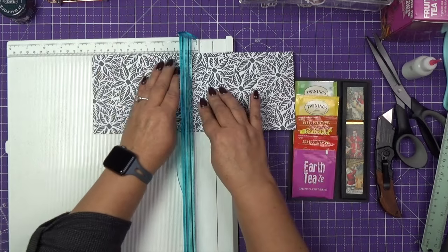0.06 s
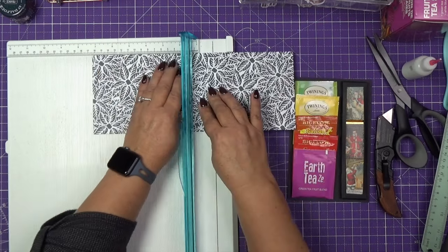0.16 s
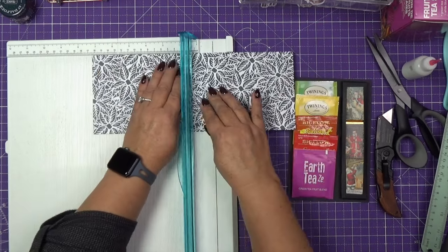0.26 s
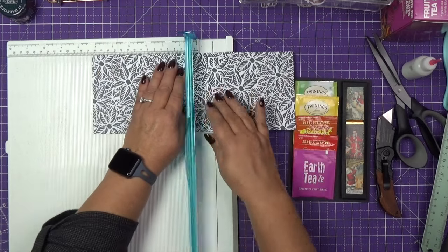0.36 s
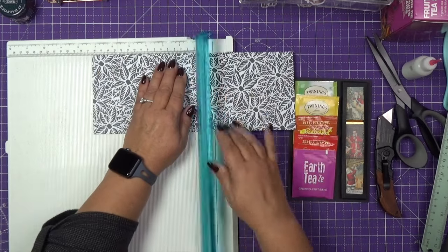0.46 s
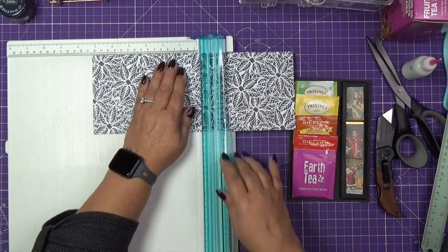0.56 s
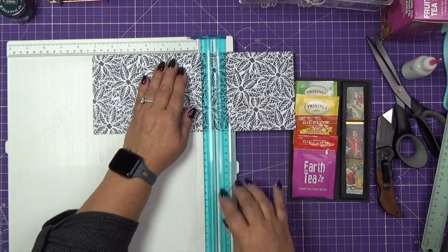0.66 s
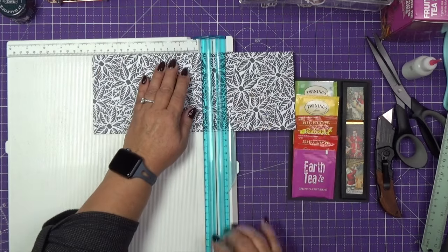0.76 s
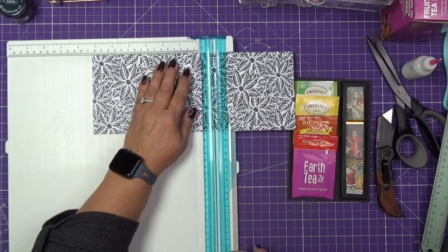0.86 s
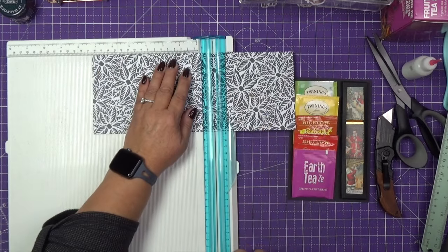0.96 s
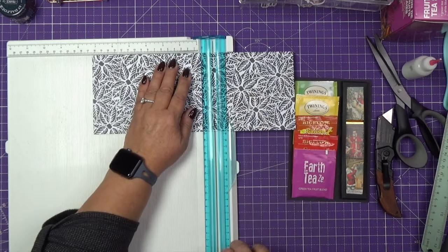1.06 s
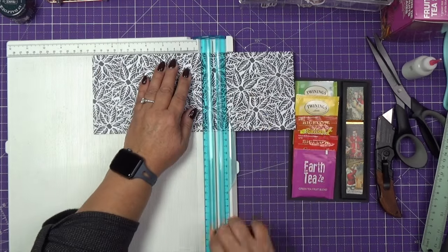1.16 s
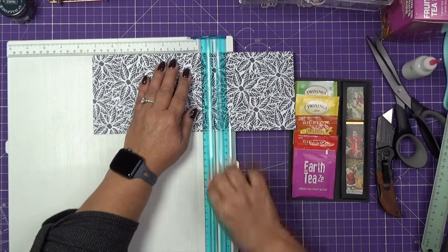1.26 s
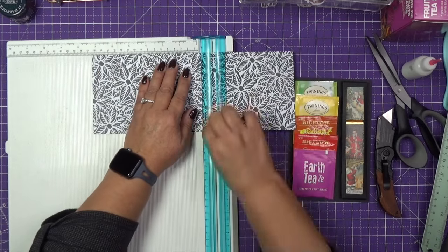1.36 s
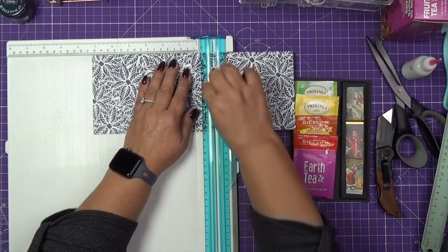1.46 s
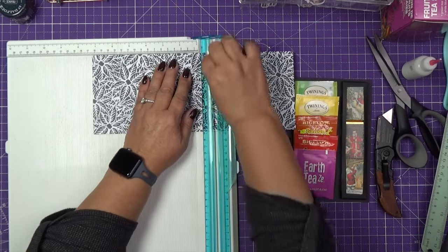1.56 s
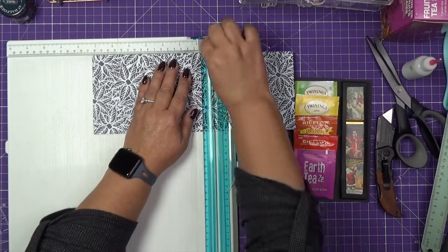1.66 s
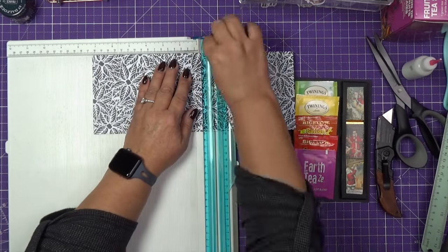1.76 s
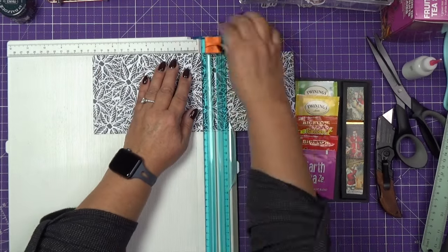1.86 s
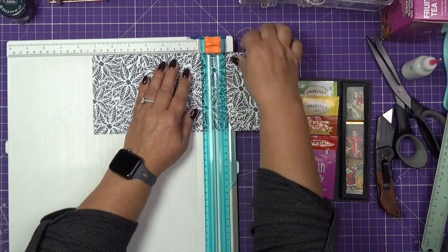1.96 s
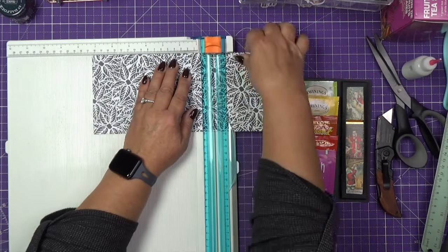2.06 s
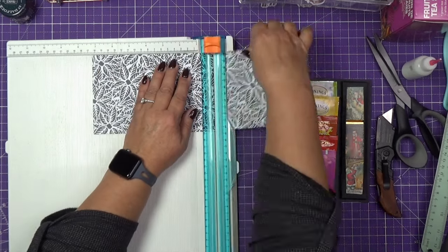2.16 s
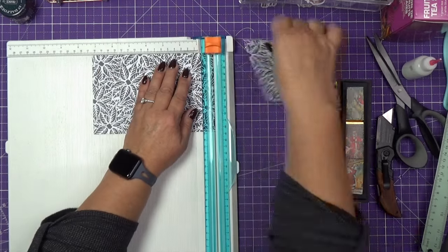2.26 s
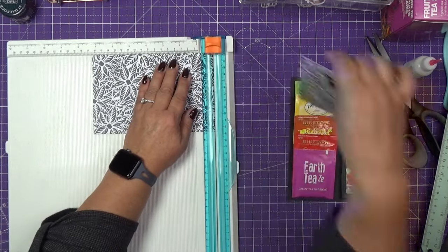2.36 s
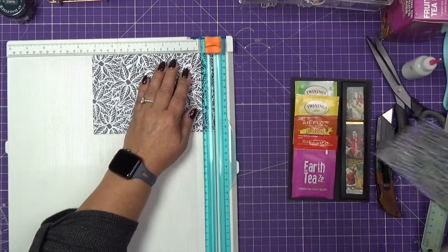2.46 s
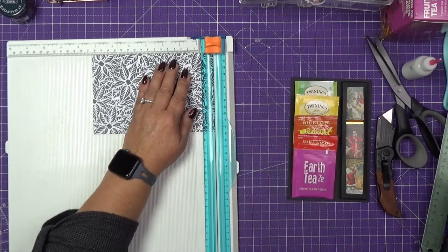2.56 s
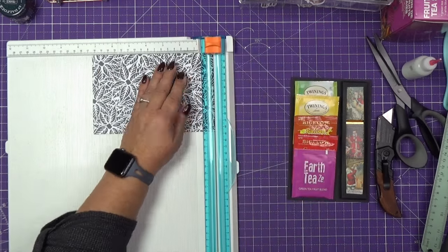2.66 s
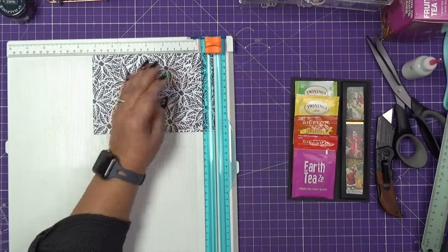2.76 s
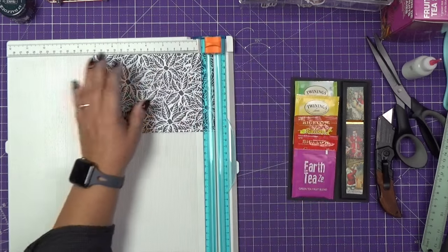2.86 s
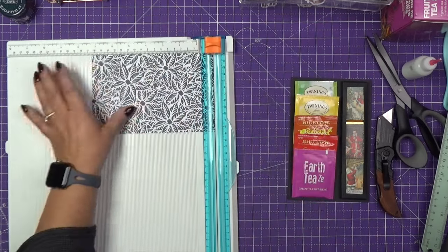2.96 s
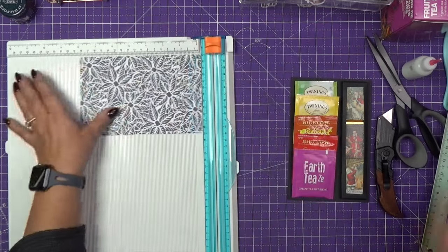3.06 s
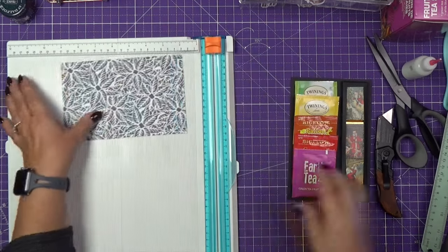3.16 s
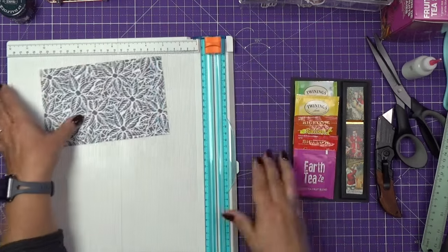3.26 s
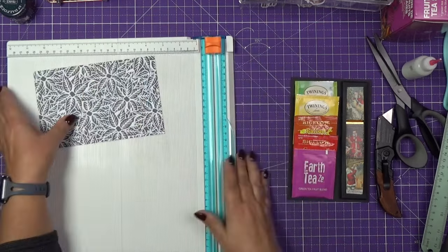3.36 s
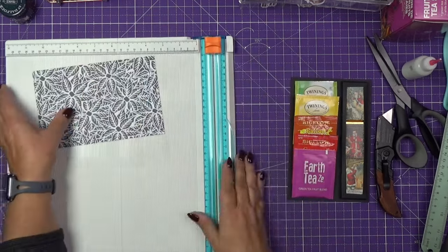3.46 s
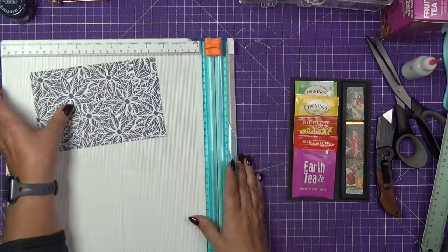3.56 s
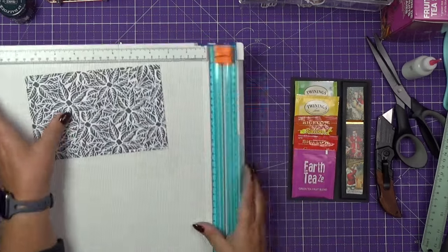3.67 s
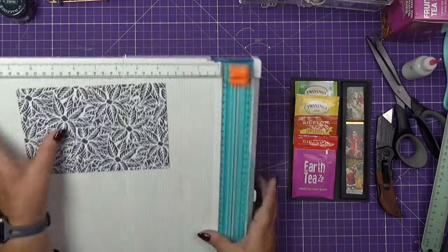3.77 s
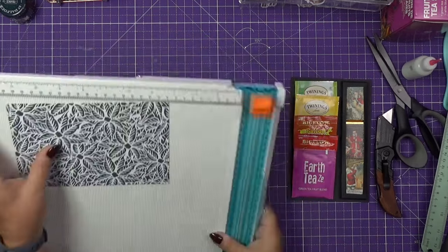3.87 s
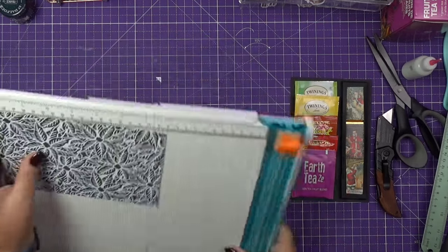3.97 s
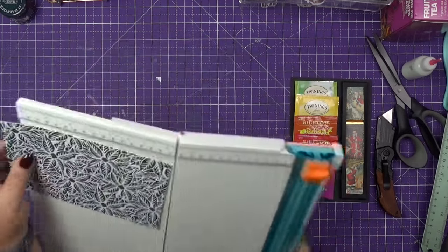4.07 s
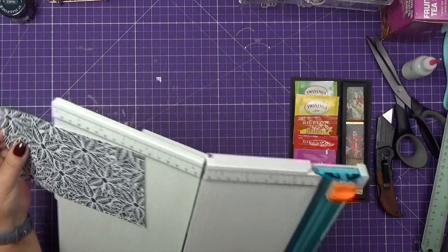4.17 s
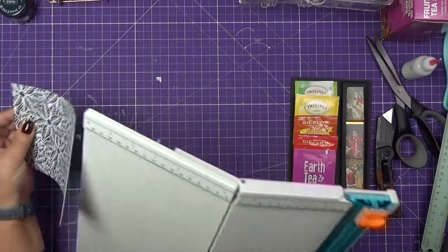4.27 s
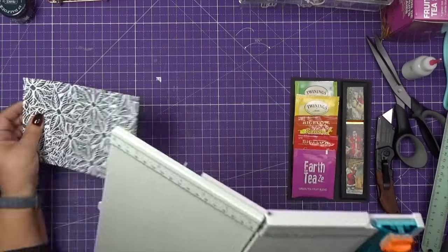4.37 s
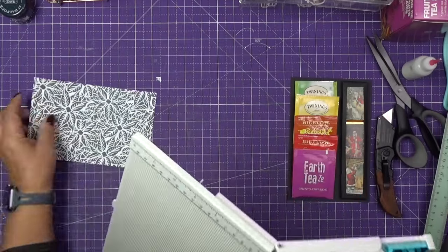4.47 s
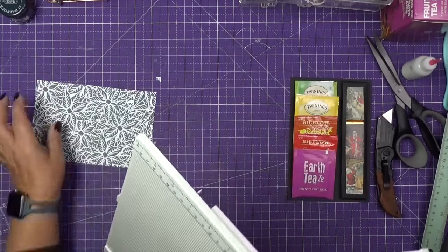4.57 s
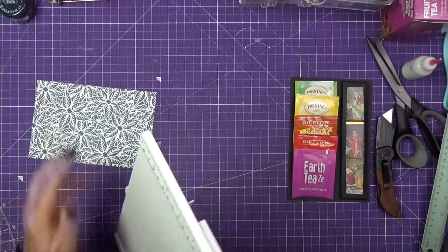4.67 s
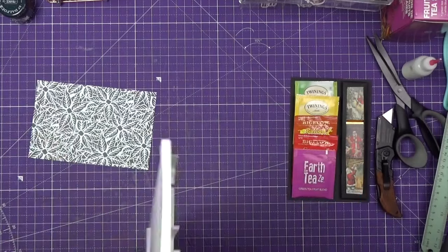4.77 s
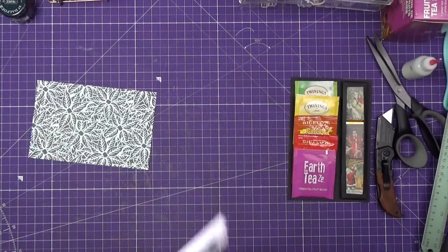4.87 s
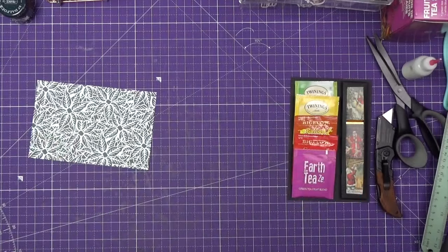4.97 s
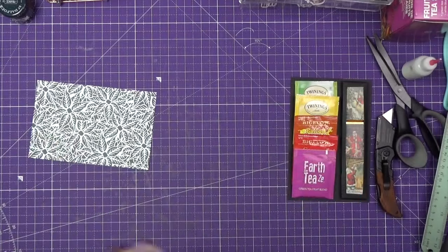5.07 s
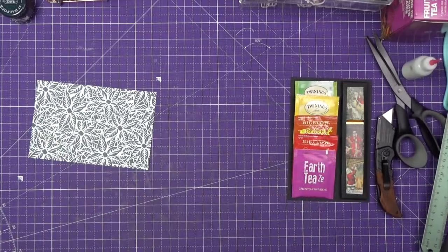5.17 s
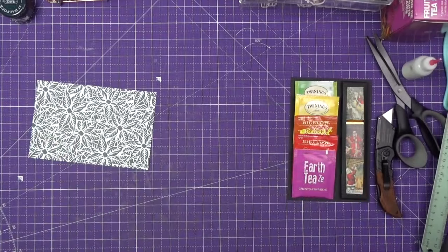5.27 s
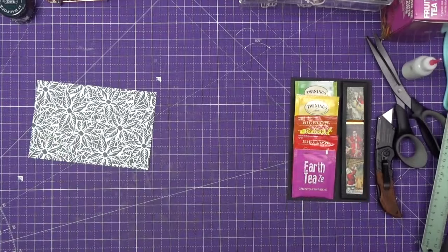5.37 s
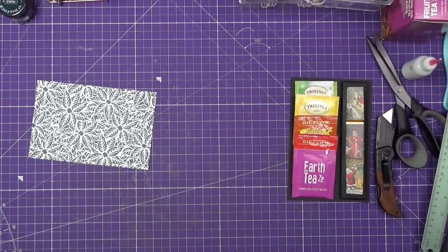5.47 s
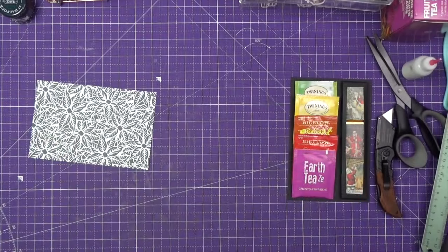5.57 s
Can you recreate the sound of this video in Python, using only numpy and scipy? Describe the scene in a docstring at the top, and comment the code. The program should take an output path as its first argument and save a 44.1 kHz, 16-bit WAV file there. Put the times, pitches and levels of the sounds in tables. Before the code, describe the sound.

A close stereo microphone catches small papercraft sounds: faint knocks, a clunk of plastic, then a short scratchy cutting stroke. The offcut comes away with a crisp snap, tiny ticks and soft rustles follow, and the hollow board drags and rattles as it folds, finishing in loud dry snaps and near silence.

```python
"""A quiet room: hands square a card on a plastic trimmer board, shut the rail and slide the blade through,
take the offcut, drag the card away, then lift and fold the board.
Every rub shakes three things: the card's surface (hiss), the thin plastic parts (scrape) and the hollow
board (thud). Snaps rattle card and plastic; knocks also ring the board's modes; ticks add small pitched clicks.
The close microphone's suppressor thins the faint room noise and cuts tails short."""
import sys
import numpy as np
from scipy import signal
from scipy.io import wavfile
from scipy.ndimage import uniform_filter1d

SR = 44100
rng = np.random.default_rng(int(sys.argv[2]) if len(sys.argv) > 2 else 0)


def waveform_to_disk(signal):
    """Save audio, clipped to [-1, 1], as 16-bit WAV at the path in sys.argv[1]."""
    frames = np.transpose(np.atleast_2d(signal))
    scaled = np.clip(frames, -1, 1) * 32767
    samples = np.round(scaled).astype(np.int16)
    wavfile.write(sys.argv[1], SR, samples)


N = 247092

# tone of the faint room noise: (frequency [Hz], relative level [dB])
HUSH_TONE = [(53, -40), (90, -10), (321, 0), (1240, -16), (2620, -13), (9000, -24), (12000, -80)]
# pressure of the blade's pass, free on the rail until it bites the card at 1.41 s:
# (time [s], surface hiss [dB], plastic scrape [dB], board rumble [dB])
BLADE_PASS = [(1.139, -66.5, -86.5, -65.5), (1.2, -51.5, -54.5, -83), (1.3, -41.5, -47.5, -62),
              (1.404, -44.5, -44, -49), (1.412, -37, -42.5, -38.5), (1.52, -39, -36, -43.5),
              (1.674, -38.5, -46.5, -48), (1.751, -73.5, -68, -69.5)]
# rubs of hands, card and board; each swells, holds and fades:
# (start [s], swell [s], hold [s], surface hiss [dB], plastic scrape [dB], board rumble [dB])
HAND_RUBS = [(0.109, 0.0097, 0.084, -63, -75, -83), (0.306, 0.037, 0.003, -50, -58.5, -57),
             (0.499, 0.025, 0.0026, -46, -35, -29), (0.677, 0.043, 0.0018, -39.5, -34, -31),
             (2, 0.0095, 0.012, -55, -49, -45), (2.06, 0.076, 0.0034, -51.5, -65, -102),
             (2.169, 0.015, 0.15, -66, -46, -64), (2.193, 0.12, 0.001, -33.5, -35, -31),
             (2.391, 0.026, 0.011, -55.5, -54.5, -61), (2.624, 0.13, 0.0081, -52.5, -72, -69),
             (2.827, 0.048, 0.011, -57, -71, -83), (2.996, 0.079, 0.23, -42.5, -82, -106),
             (3.631, 0.041, 0.041, -49.5, -43, -38.5), (3.758, 0.29, 0.0082, -34.5, -54.5, -77),
             (4.092, 0.028, 0.055, -36.5, -55.5, -61.5), (4.171, 0.081, 0.0019, -31, -42.5, -57),
             (4.241, 0.044, 0.25, -49.5, -44.5, -50.5), (4.612, 0.095, 0.067, -42, -38, -42.5),
             (4.843, 0.003, 0.039, -37, -46.5, -58.5), (4.954, 0.0076, 0.024, -26, -27, -65),
             (4.979, 0.033, 0.087, -41.5, -31.5, -53)]
# how fast a rub falls silent: (surface [dB/s], plastic [dB/s], board [dB/s])
RUB_FADES = [300, 316, 308.5]
# tone of the card's surface hiss: (frequency [Hz], relative level [dB])
SURFACE_TONE = [(1470, -51.5), (2500, -13), (4080, -8.5), (8730, 0), (13600, -22), (15800, -48)]
# tone of the thin plastic parts: (frequency [Hz], relative level [dB])
PLASTIC_TONE = [(530, -19), (900, 1.5), (1590, 3.5), (1960, 5.5), (5500, -2.5), (7150, -43), (12100, -120)]
# tone of the hollow board under rubbing: (frequency [Hz], relative level [dB])
BOARD_TONE = [(41, -55.5), (70, -30), (237, -8.5), (615, -6), (888, -10), (1600, -14), (2080, -42),
              (3520, -120)]
# resonances of the freely hanging board: (frequency [Hz], width [Hz], relative level [dB])
RESONANCES = [(135, 6.7, -33), (242, 35, -11), (317, 53, -3.5), (423.4, 67, 2.5), (557, 30, -6),
              (606, 38, -5.5), (780, 41, 2), (995, 8.3, -7.5), (1294, 51, -2.5), (1695, 6.3, 3)]
# decay of the room's echoes: (frequency [Hz], t60 [s])
ROOM_DECAY = [(200, 0.36), (1400, 0.26), (9000, 0.36)]
# broad snaps of card and rail; each layer scales the decay:
# (time [s], surface rattle [dB], plastic rattle [dB], nominal t60 [s])
CARD_SNAPS = [(0.8883, -54, -57.5, 0.26), (1.032, -58.5, -58, 0.22), (2.251, -26, -22.5, 0.047),
              (2.304, -12.5, -46, 0.0099), (2.938, -50, -60.5, 0.15), (3.049, -36, -52.5, 0.094),
              (3.71, -23.5, -26.5, 0.023), (4.368, -31.5, -29.5, 0.086), (4.885, -17.5, -41.5, 0.032),
              (4.968, -8, -39, 0.018), (5.02, -7, -18, 0.014), (5.0438, -20.5, -30.5, 0.088),
              (5.16, -34.5, -29.5, 0.11), (5.5778, -40, -42, 0.052)]
# knocks on the board; each layer scales the decay: (time [s], surface rattle [dB], plastic rattle [dB],
# board ring [dB], pitch favoured by the struck place [Hz], nominal t60 [s])
BOARD_KNOCKS = [(0.1448, -47, -51.5, -32.5, 470, 0.065), (0.211, -56, -73, -48, 550, 0.067),
                (0.5145, -50, -44, -42.5, 600, 0.087), (0.563, -44, -39.5, -24, 670, 0.16),
                (0.679, -56, -62, -34, 640, 0.0078), (1.077, -51, -47.5, -40, 830, 0.014),
                (1.12, -60, -61, -42.5, 169, 0.085), (1.407, -46, -47, -27, 630, 0.05),
                (1.824, -47, -62.5, -38.5, 284, 0.088), (2.0076, -53, -75, -46.5, 208, 0.16),
                (2.1886, -37, -42, -31, 640, 0.059), (2.226, -53.5, -42.5, -25, 590, 0.18),
                (3.005, -57.5, -91, -54.5, 630, 0.15), (3.072, -57.5, -69, -43.5, 530, 0.024),
                (3.093, -61, -72, -44.5, 540, 0.11), (3.124, -57, -72, -44.5, 565, 0.05),
                (3.447, -86, -59, -38.5, 850, 0.17), (3.599, -69, -60.5, -45.5, 560, 0.2),
                (3.651, -44, -40.5, -27.5, 745, 0.028), (3.696, -55, -57, -31.5, 750, 0.037),
                (3.767, -56, -53, -40, 710, 0.072), (3.897, -35.5, -44, -26.5, 380, 0.12),
                (4.046, -32.5, -33.5, -30.5, 600, 0.031), (4.065, -57, -44.5, -29, 273, 0.13),
                (5.086, -19.5, -29.5, -33, 792, 0.073)]
# small ticks of nails, latch and card edges: (time [s], peak level [dB], pitch [Hz], chatter t60 [s])
SMALL_TICKS = [(0.838, -46, 7830, 0.063), (0.9611, -45, 3770, 0.03), (1.084, -41, 1580, 0.053),
               (1.8257, -35.5, 3580, 0.052), (2.1295, -40.5, 2040, 0.056), (2.6732, -36, 6230, 0.013),
               (2.7062, -39.5, 5850, 0.022), (2.7422, -28, 4800, 0.011), (2.8786, -41.5, 3040, 0.017),
               (2.947, -46.5, 2260, 0.083), (2.9958, -45.5, 3870, 0.063), (3.006, -31.5, 5040, 0.0061),
               (3.932, -26.5, 3530, 0.011), (5.317, -50.5, 4580, 0.12), (5.32, -50.5, 2640, 0.18)]
# the lifted board drags and rattles as it folds: (time [s], level [dB], favoured pitch [Hz])
FOLD_PATH = [(4.22, -49, 500), (4.27, -45.5, 700), (4.46, -42, 550), (4.56, -44.5, 560), (4.66, -35, 618),
             (4.77, -40.5, 1390), (4.83, -55.5, 900), (4.95, -68, 850), (4.97, -36, 850), (5.1, -36.5, 850),
             (5.239, -67, 1000)]
# where the hands work: (time [s], left minus right [dB])
HAND_PAN = [(0, 1.4), (2.6, -0.5), (4.199, 1.4), (4.7, 0.5)]

HUSH_DB = -77  # level of the room noise before the suppressor
SWELL_DB = 23.5  # how far below its strength a rub starts
HELD_HZ = 40  # hands and table damp the board, widening every mode by this much
ROOM_DB = -16.5  # level of the echoes against the direct sound
EDGE_HZ = 15900  # upper band limit


def gain_of(db):
    """Turn decibels into an amplitude factor."""
    return 10 ** (np.asarray(db) / 20)


def evened(x):
    """Scale a signal to an RMS of 1."""
    return x / np.sqrt(np.mean(x ** 2) + 1e-20)


def read(points, hz):
    """Read a curve between its points along a logarithmic frequency axis."""
    f, value = np.transpose(points)
    return np.interp(np.log(hz + 1), np.log(f + 1), value)


def hush():
    """Room noise is a shaped stereo haze whose level flickers in patches of time and frequency."""
    frames, hz = N // 128 + 5, np.fft.rfftfreq(512, 1 / SR)
    a, b, c, d, patches = rng.standard_normal((frames, 257, 5)).T
    patches = uniform_filter1d(patches, size=4, axis=0)
    patches = evened(uniform_filter1d(patches, size=10, axis=1))
    shared, side = a + 1j * b, c + 1j * d
    z = np.array([shared + 0.39 * side, shared - 0.98 * side])
    z *= gain_of(read(HUSH_TONE, hz)[:, None] + 3.5 * patches)
    noise = signal.istft(z, nperseg=512, noverlap=384)[1][:, :N]
    return gain_of(HUSH_DB) * evened(noise)


def patchy(x, patchy_db):
    """The contact wanders, so narrow resonances come and go."""
    z = signal.stft(x, nperseg=512, noverlap=384)[2]
    field = rng.standard_normal(z.shape[::-1]).T
    field = uniform_filter1d(field, size=2, axis=0)
    field = uniform_filter1d(field, size=22, axis=1)
    z = z * gain_of(patchy_db * evened(field))
    return evened(signal.istft(z, nperseg=512, noverlap=384)[1][:N])


def grit(catches_per_s, catch_db, flutter_db, patchy_db):
    """Friction force is fine noise with fibres that catch now and then, fluttering in strength."""
    smooth, chance = rng.standard_normal(N), rng.random(N)
    strength, slow = rng.standard_normal(N), rng.standard_normal(N)
    catches = strength * (chance < catches_per_s / SR) * gain_of(catch_db)
    force = patchy(smooth, patchy_db) + catches
    flutter = evened(uniform_filter1d(slow, size=220))
    return evened(force * gain_of(flutter_db * flutter))


def rubbing():
    """The pressure of blade and hands scales a separate friction force on surface, plastic and board."""
    t = np.arange(N) / SR
    s, *levels = np.transpose(BLADE_PASS)
    push = np.array([gain_of(np.interp(t, s, db, -140, -140)) for db in levels])
    for start, swell, hold, *levels in HAND_RUBS:
        since = t[:SR] - swell  # time since full strength
        rise_db = SWELL_DB * np.minimum(since / swell, 0)
        fall_db = np.outer(RUB_FADES, np.maximum(since - hold, 0))
        pressure = gain_of(np.array(levels)[:, None] + rise_db - fall_db)
        part = push[:, round(start * SR):][:, :SR]
        part += pressure[:, :part.shape[1]]
    push = uniform_filter1d(push, size=130, axis=1)  # about 3 ms, rounds the edges
    surface = grit(600, catch_db=11, flutter_db=1.3, patchy_db=3.5)
    plastic = grit(350, catch_db=13, flutter_db=2.2, patchy_db=4.2)
    board = grit(150, catch_db=14, flutter_db=3, patchy_db=4.5)
    return push * [surface, plastic, board]


def body(points, size=4096):
    """A shaken part answers with a causal response of energy 1, its tone lifted at the board's modes."""
    hz = abs(np.fft.fftfreq(size, 1 / SR))
    db = read(points, hz)
    for f, width, _ in RESONANCES:
        db = db + 2.5 / (1 + (2 * (hz - f) / (width + HELD_HZ)) ** 2)
    log_gain = np.log(gain_of(np.maximum(db, -100)))
    minimum_phase = -signal.hilbert(log_gain).imag  # puts the energy as early as possible
    taps = np.fft.ifft(np.exp(log_gain + 1j * minimum_phase)).real[:size // 2]
    return taps / np.linalg.norm(taps)


def room(x):
    """Sparse echoes of random sign arrive differently left and right, each band dying at its own rate."""
    taps = np.zeros((2, SR // 3))
    at = np.arange(100, SR // 3 - 20, 20)
    at = at + rng.integers(0, 20, (2, len(at)))
    np.put_along_axis(taps, at, rng.choice([-1., 1.], at.shape), 1)
    hz, t, z = signal.stft(taps, SR, nperseg=256)
    decay_db = -60 * t / read(ROOM_DECAY, hz)[:, None]
    tail = signal.istft(z * gain_of(decay_db), SR, nperseg=256)[1]
    shared = tail.mean(0)
    apart = tail - shared
    apart -= uniform_filter1d(apart, size=50, axis=1)  # the capsules sit close together: bass is alike
    tail = shared + 1.2 * apart
    return signal.fftconvolve(x[None], tail / np.linalg.norm(tail[0]), axes=1)[:, :N]


def tapping():
    """Each snap or knock is a sudden rattle that dies away on the card and the thin plastic."""
    t, force = np.arange(SR // 5) / SR, np.zeros((2, N + SR))
    lasts = np.array([[.7], [1.1]])  # surface dies sooner than plastic
    blunt = signal.butter(4, 2500, fs=SR, output="sos")
    for s, surface_db, plastic_db, *board, t60 in CARD_SNAPS + BOARD_KNOCKS:
        rattle = rng.standard_normal((2, len(t))) * gain_of(-60 * t / (t60 * lasts))
        rattle *= 1 - np.exp(-t / 0.0012)  # soft onset
        if board:  # a knock is blunter, so the plastic answers duller
            rattle[1] = 3 * signal.sosfilt(blunt, rattle[1])
        at = round(s * SR)
        force[:, at:at + len(t)] += rattle * gain_of([[surface_db], [plastic_db]])
    return force[:, :N]


def thuds():
    """A knock's first blow and rough, dying contact ring the modes, most those near the struck place's pitch."""
    t, out = np.arange(SR // 4) / SR, np.zeros(N + SR)
    hz, width, _ = np.transpose(RESONANCES)[:, :, None]
    for s, _, _, board_db, place_hz, t60 in BOARD_KNOCKS:
        shift = rng.standard_normal((len(hz), 1))  # each knock detunes the modes a little
        contact = rng.standard_normal(len(t)) + 4 * np.exp(-t / 0.00032)
        # loose parts touch on and off
        clatter_db = 4 * evened(uniform_filter1d(rng.standard_normal(len(t)), size=150))
        contact *= gain_of(clatter_db - 60 * t / (2.0 * t60))
        share = np.exp(-(np.log(hz / place_hz) / 0.51) ** 2)
        share = share + 0.062 * (hz < place_hz)  # lower modes always join
        tone = np.sin(2 * np.pi * hz * (1 + 0.041 * shift) * t)
        build = np.minimum(hz * t / 2, 1)  # full after two cycles
        decay = np.exp(-np.pi * (width + HELD_HZ) * t)
        ring = (share * tone * build * decay).sum(0)
        ring = signal.fftconvolve(ring, contact)[:len(t)]
        out[round(s * SR):][:len(t)] += gain_of(board_db) * ring / abs(ring).max()
    return out[:N]


def ticking():
    """A brief chatter passes a resonance at the tick's pitch; the longer it lasts, the narrower."""
    t, out = np.arange(SR // 6) / SR, np.zeros(N + SR)
    for s, db, hz, t60 in SMALL_TICKS:
        chatter = rng.standard_normal(len(t)) * gain_of(-60 * t / t60)
        ratio = 1.06 + .003 / t60  # band edge against the pitch
        band = signal.butter(2, [hz / ratio, hz * ratio], "band", fs=SR, output="sos")
        tick = signal.sosfilt(band, chatter)
        out[round(s * SR):][:len(t)] += gain_of(db) * tick / abs(tick).max()
    return out[:N]


def folding():
    """Friction keeps the free board's modes sounding, most those near the moving favoured pitch."""
    t, (s, db, favoured_hz) = np.arange(N) / SR, np.transpose(FOLD_PATH)
    drag = grit(300, catch_db=10, flutter_db=2, patchy_db=2)
    centre = np.interp(t, s, favoured_hz)
    ring = np.zeros(N)
    for hz, width, free_db in RESONANCES:
        peak = signal.iirpeak(hz, hz / (2 * width), SR)
        once = signal.lfilter(*peak, drag)
        steep = evened(signal.lfilter(*peak, once))  # filtered twice for steeper skirts
        share = np.exp(-(np.log(hz / centre) / 0.67) ** 2)
        ring += share * gain_of(free_db) * steep
    return gain_of(np.interp(t, s, db, -140, -140)) * ring / 2


def scene():
    """Rubs and rattles shake the three bodies; rings and ticks join, panned, with echoes and room noise."""
    force = rubbing()
    force[:2] += tapping()
    tones = (SURFACE_TONE, PLASTIC_TONE, BOARD_TONE)
    shaken = sum(signal.oaconvolve(f, body(tone))[:N] for f, tone in zip(force, tones))
    near = shaken + thuds() + ticking() + folding()
    pan_db = np.interp(np.arange(N) / SR, *np.transpose(HAND_PAN))
    direct = near * gain_of(np.outer([.5, -.5], pan_db))
    return direct + gain_of(ROOM_DB) * room(near) + hush()


def record(dry):
    """After a bass cut, the suppressor turns down each band that sinks toward silence; then the band limit."""
    dry = signal.sosfilt(signal.butter(3, 90, "high", fs=SR, output="sos"), dry)
    z = signal.stft(dry, nperseg=256, noverlap=192)[2]
    power = (abs(z) ** 2).mean(0)  # both channels together
    power = uniform_filter1d(power, size=5, axis=0)
    power = uniform_filter1d(power, size=6, axis=1)
    below_db = np.clip(-88 - 10 * np.log10(abs(power) + 1e-16), 0, 20)  # depth under the threshold
    kept = z * gain_of(-.8 * below_db)
    kept = signal.istft(kept, nperseg=256, noverlap=192)[1][:, :N]
    band_limit = signal.firwin(511, EDGE_HZ, window=("kaiser", 9), fs=SR)
    return signal.oaconvolve(kept, band_limit[None], "same")


dry = scene()
out = record(dry)
waveform_to_disk(out)
```